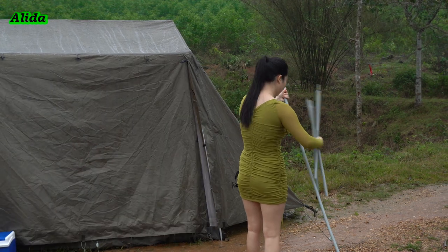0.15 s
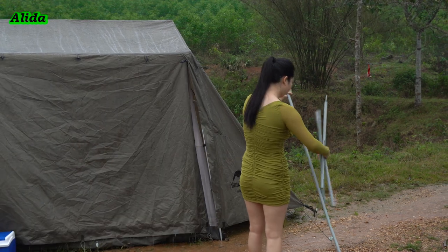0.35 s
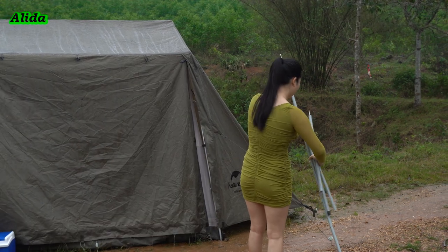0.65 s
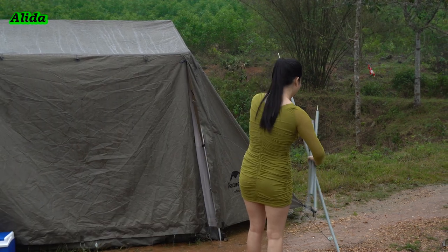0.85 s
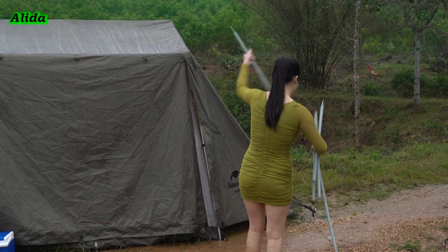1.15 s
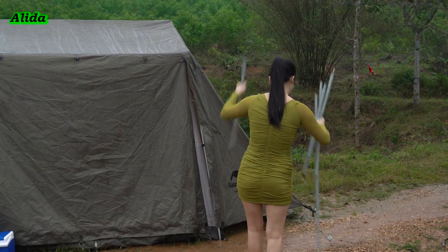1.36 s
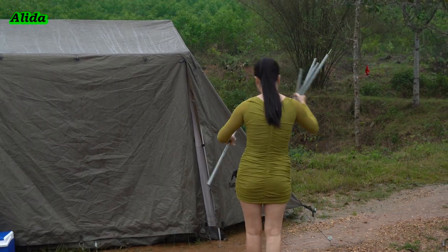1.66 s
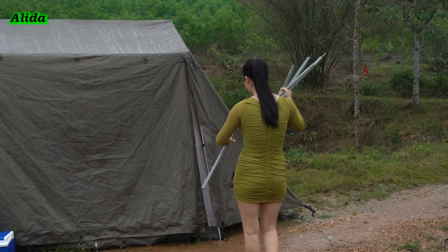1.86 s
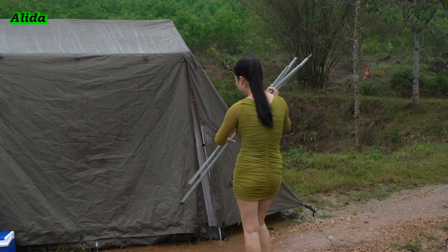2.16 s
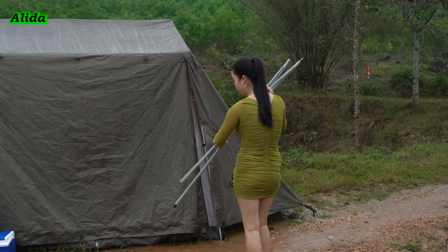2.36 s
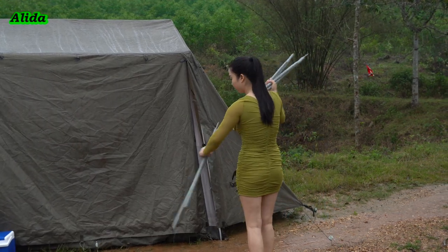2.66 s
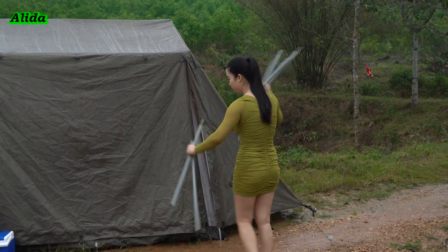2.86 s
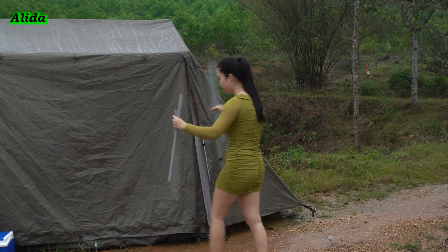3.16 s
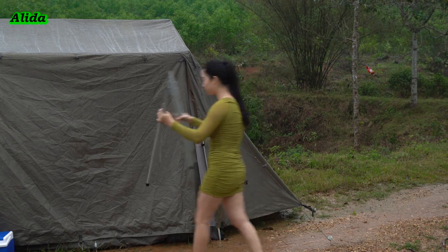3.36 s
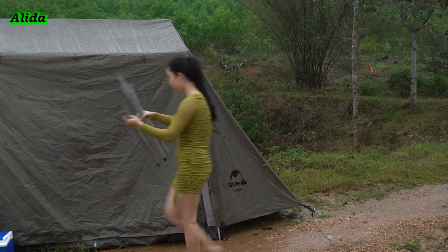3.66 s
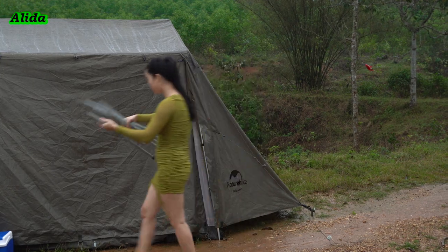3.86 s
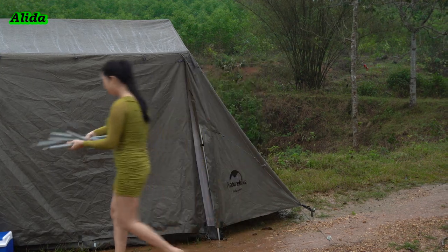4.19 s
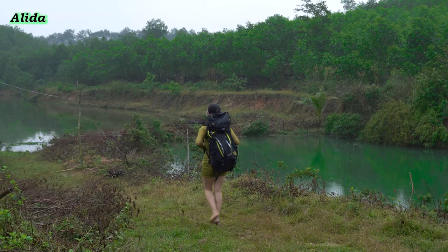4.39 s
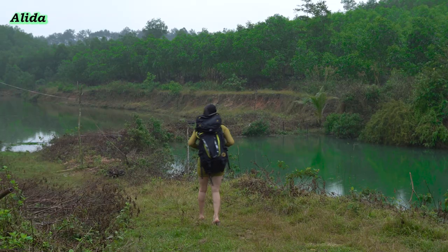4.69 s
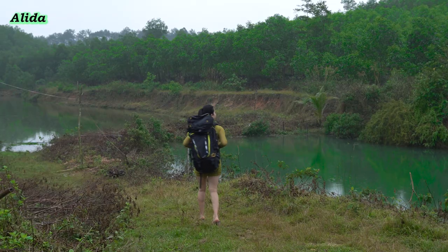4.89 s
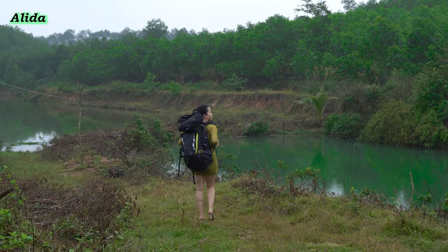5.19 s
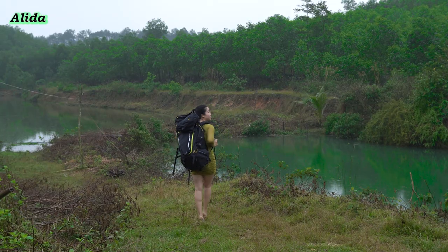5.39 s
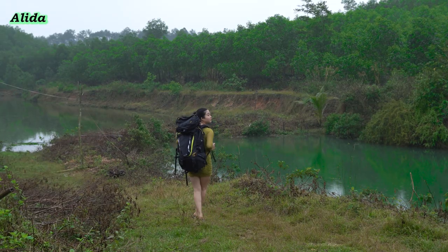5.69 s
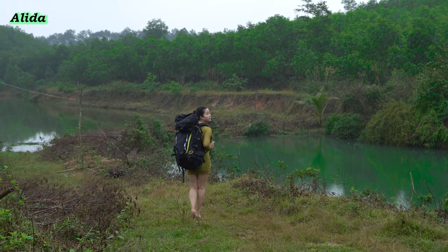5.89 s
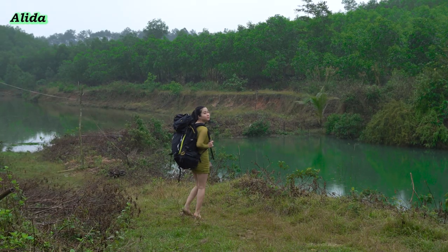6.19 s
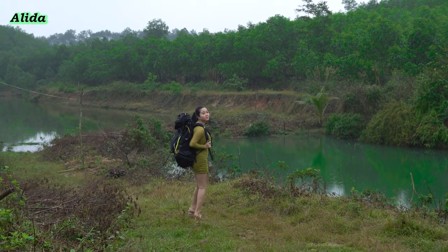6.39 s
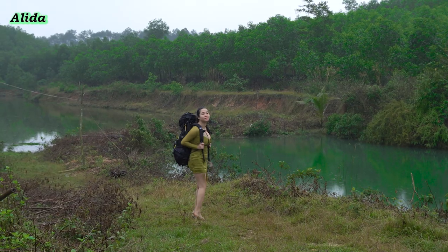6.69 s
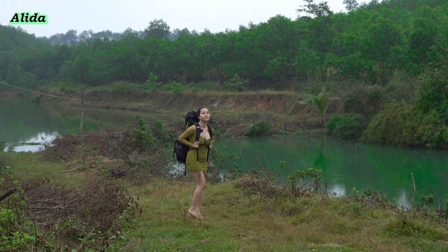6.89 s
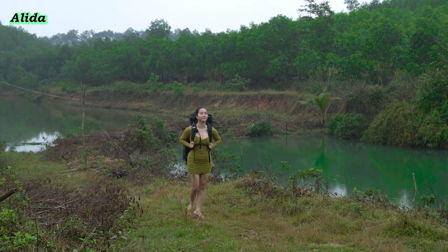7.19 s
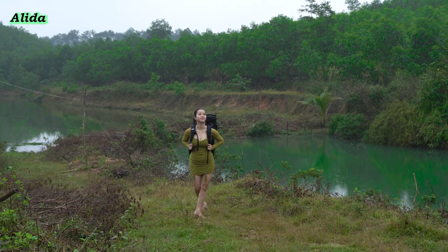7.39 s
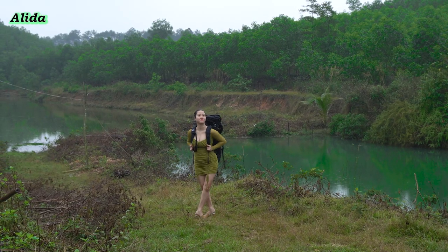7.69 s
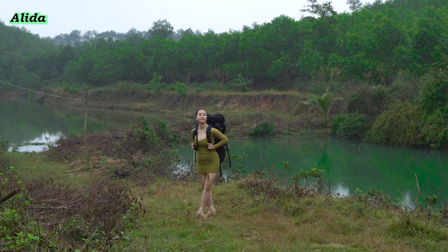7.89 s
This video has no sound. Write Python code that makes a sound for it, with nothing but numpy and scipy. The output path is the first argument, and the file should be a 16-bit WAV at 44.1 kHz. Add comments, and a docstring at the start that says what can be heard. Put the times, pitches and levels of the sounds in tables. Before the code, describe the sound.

Thin metal tent poles clank, scrape and ring briefly as they are bundled outdoors, then only soft air and faint insects remain.

```python
"""Metal tent poles are pulled apart and bundled outdoors, close to a pair of microphones.
Clanks are bursts of tiny contacts that ring the tubes' modes; beating sine pairs sing on from loose tubes.
Sections rasp as friction drives the sleeve joint, one rubs with a hollow wavering note, handling ticks.
Behind them: soft air, rustle and swishes of shaped noise, a steady insect band and a few far falling chirps."""
import sys
import numpy as np
from scipy import signal
from scipy.fft import rfft, irfft, next_fast_len
from scipy.io import wavfile
from scipy.ndimage import uniform_filter1d

SR = 44100
rng = np.random.default_rng(int(sys.argv[2]) if len(sys.argv) > 2 else 0)


def digitize_waveform(pressure):
    """Quantize a signal to 16-bit integers and store it at the path in sys.argv[1].

    Rows of a 2-D input are taken as channels; values are limited to [-1, 1].
    """
    field = np.atleast_2d(pressure).T
    bounded = np.clip(field, -1, 1)
    quanta = np.round(bounded * 32767).astype(np.int16)
    wavfile.write(sys.argv[1], SR, quanta)


N = 354996
TIME = np.arange(N) / SR


def from_db(db):
    """Decibels to gain."""
    return 10 ** (np.asarray(db) / 20)


def rms_one(x):
    """Scale to unit power."""
    return x / np.sqrt(np.mean(x ** 2) + 1e-20)


def in_time(rows):
    """Each column of a curve, sample by sample."""
    s, *columns = np.transpose(rows)
    return [np.interp(TIME, s, column) for column in columns]


def at_hz(points, hz):
    """Read a spectrum on a log-frequency axis."""
    f, value = np.transpose(points)
    return np.interp(np.log(hz), np.log(f), value)


def band(x, low_hz, high_hz, order=2):
    """Causal band-pass."""
    edges = np.clip([low_hz, high_hz], 10, .48 * SR)
    return signal.sosfilt(signal.butter(order, edges, "band", fs=SR, output="sos"), x + 1e-18)


def pan(db):
    """Left and right gains for a level difference; positive leans left."""
    return from_db(np.array([[.5], [-.5]]) * db)


def add(out, s, sound):
    """Mix a sound in at time s."""
    at = max(0, round(s * SR))
    out[:, at:at + sound.shape[1]] += sound[:, :N - at]


def drift(rate):
    """Slow chance of spread 1, with `rate` turns a second."""
    knots = rng.standard_normal(1000)
    return rms_one(np.interp(TIME * rate, np.arange(len(knots)), knots))


def stereo(mid, side, likeness):
    """Blend two independent noises so that left and right are alike to the given degree (0-1)."""
    return np.sqrt(1 + likeness) * mid + np.sqrt(1 - likeness) * side * [[1], [-1]]


def grains(size, grain_db, likeness):
    """Stereo stream of tiny contacts, their force uneven from one 16-sample grain to the next; rms 1."""
    mid, side = rng.standard_normal((2, size))
    luck = np.clip(rng.standard_normal(size // 16 + 1), -2, 2)
    force = from_db(grain_db * luck).repeat(16)[:size]
    return rms_one(force * stereo(mid, side, likeness))


def resonate(drive, resonances):
    """Parallel resonances, each with its own share of the power; rms 1."""
    out = 0
    for hz, width_hz, db in resonances:
        out = out + from_db(db) * rms_one(band(drive, hz - width_hz / 2, hz + width_hz / 2))
    return rms_one(out)


def even(x, window_s):
    """Steady the strength of a friction sound."""
    power = uniform_filter1d(np.mean(x ** 2, axis=0), max(2, int(window_s * SR)))
    return x / np.sqrt(power + 1e-9)


# every clank rebounds once: the longer its chatter, the later and weaker, and more of the bundle joins in
REBOUND_S, REBOUND_PER_CHATTER, REBOUND_LOSS_DB_PER_S, REBOUND_NEIGHBOURS_DB = .0045, 1.6, 413, 2
# pole against pole: (time [s], level before placing [dB], treble over bass [dB], rise [s], chatter [s],
# neighbour poles [dB], favoured pitch [Hz])
CLANKS = [(0.004, -54.5, -3, 0.0017, .035, -9, 5250), (0.108, -54.5, 0, .007, .019, -6, 5300),
          (0.178, -46, -3, 0.00069, 0.04, -10, 1490), (0.696, -26, -10.5, 0.00049, 0.016, -23.5, 2330),
          (0.732, -38.5, 0, 0.00079, .005, -6, 5430), (0.777, -32, -10, 0.0017, 0.01, -13.5, 2500),
          (0.848, -51, -10, .003, 0.014, 7, 2450),
                    (0.864, -40.5, -13.5, 0.0012, 0.032, -6.5, 2230),
          (0.908, -41.5, -17.5, 0.0055, 0.024, -6, 2330), (1.045, -27.5, 14.5, 0.0003, .0035, -20, 9500),
          (1.433, -45, -10, 0.0021, 0.016, -18, 2680), (2.088, -50.5, -1.5, .003, 0.0087, -9, 2470),
          (2.287, -36.5, -11.5, 0.0014, 0.014, -1.5, 2040), (2.654, -28, 14.5, .0008, .0022, -16, 11500),
          (2.767, -45.5, -8, 0.00086, 0.0082, -6, 2640), (2.824, -27.5, -5.5, 0.0076, 0.015, -4, 1490),
          (3.296, -54.5, -23.5, 0.0085, 0.011, 4, 2730), (3.336, -53, -9, .002, 0.056, -10, 2380),
          (3.385, -50, 3, 0.0024, 0.013, -12, 1900), (4.163, -27, -12, 0.002, 0.026, -16.5, 1450),
          (4.2081, -31, -10, .0004, .022, -6.5, 1800), (4.229, -28.5, -4.5, 0.0039, 0.0078, -7, 5800),
          (4.244, -36.5, -14, 0.002, .014, -13, 2450), (4.276, -42.5, -11, 0.0035, .011, -10, 5430)]


def clanks():
    """Each blow of pole on pole is followed by one rebound."""
    out = np.zeros((2, N))
    for s, db, tilt_db, rise_s, chatter_s, neighbours_db, favoured_hz in CLANKS:
        add(out, s, clank(db, tilt_db, rise_s, chatter_s, neighbours_db, favoured_hz))
        gap_s = REBOUND_S + REBOUND_PER_CHATTER * chatter_s
        rebound_db = db - REBOUND_LOSS_DB_PER_S * gap_s
        add(out, s + gap_s, clank(rebound_db, tilt_db, chatter_s / 2, chatter_s,
                                  neighbours_db + REBOUND_NEIGHBOURS_DB, favoured_hz))
    return out


# the middle band: its level when the neighbours ring as loud as the pole [dB], and its dB per dB of theirs
MIDDLE_DB, MIDDLE_FOLLOWS = 4, 0.43
# bending modes of the pole in the hand: (frequency [Hz], relative level [dB], t60 [s])
POLE = [(772, -19, 0.11), (1485, -4.5, 0.094), (2432, -6, 0.037), (2465, -4.5, 0.087), (3523, -7.5, 0.068),
        (4730, -9.5, 0.07), (5570, -11, 0.03), (6150, -13, 0.019), (7570, 3, 0.018), (8280, 1, 0.04),
        (9140, -1.5, 0.018), (10850, -1.5, 0.074), (11600, -17, 0.044), (12400, -10.5, 0.035),
        (14800, 4.5, 0.02)]
# bending modes of its neighbours in the bundle: (frequency [Hz], relative level [dB], t60 [s])
NEIGHBOURS = [(654, -14.5, 0.11), (1580, -7.5, 0.1), (1803, -4.5, 0.047), (1940, -13, 0.031),
              (2726, 4.5, 0.07), (2846, -38, 0.062), (3910, 0.5, 0.035), (5230, 0, 0.13),
              (6600, -36, 0.023), (7200, -49.5, .07), (8450, -7, 0.046), (9500, 3.5, 0.02), (9840, 7, 0.04),
              (14100, 3, .02)]


def clank(db, tilt_db, rise_s, chatter_s, neighbours_db, favoured_hz, impact_db=0.5, impact_s=0.002,
          crack_db=-12.0, shimmer_db=-6.0, shimmer_t60=0.11, settle_s=0.0062, strike_s=0.018):
    """Tubes buzz against each other in a burst of tiny contacts, then ring briefly in the hand."""
    t = TIME[:SR // 4]
    pressure = np.minimum((t + 1 / SR) / max(rise_s, 1 / SR), 1) * np.exp(-.5 * t / chatter_s)
    pressure = pressure * (1 + from_db(impact_db) * np.exp(-t / impact_s))   # extra force at first
    settling = np.exp(-np.maximum(t - chatter_s, 0) / settle_s)
    contacts = grains(len(t), grain_db=5.0, likeness=0.5) * pressure * settling

    neighbours = ring(contacts[0], NEIGHBOURS, favoured_hz)
    metal = ring(contacts[0], POLE, favoured_hz) + from_db(neighbours_db) * neighbours

    # the contacts also radiate directly, as a broad crack with a gap between bending and wall modes
    crack = band(contacts, 1260, 2750, order=4)
    crack = crack + 1.23 * band(contacts, 4880, 7920, order=4)
    crack = crack + 0.72 * band(contacts, 7000, 14200, order=4)

    # countless weak wall modes blur it into a shimmer, fuller the longer the chatter lasts
    walls = grains(len(t), grain_db=7.0, likeness=0.97) * from_db(-60 * t / shimmer_t60)
    shimmer = rms_one(signal.fftconvolve(crack[:1], walls, axes=1)[:, :len(t)])
    shimmer = shimmer * min(1, chatter_s / strike_s) ** 0.46
    sound = rms_one(metal) + from_db(crack_db) * rms_one(crack) + from_db(shimmer_db) * shimmer

    # the hardness of the touch shares the energy between low, middle and high modes
    middle_db = MIDDLE_DB + MIDDLE_FOLLOWS * neighbours_db
    out = 0
    for low_hz, high_hz, share_db, lean_db in [(700, 3430, -tilt_db / 2, 0),
                                               (3300, 6780, middle_db, TREBLE_LEFT_DB),
                                               (7000, 15000, tilt_db / 2, TREBLE_LEFT_DB)]:
        part = band(sound, low_hz, high_hz, order=4)
        part = part / np.std(part[:, :int(strike_s * SR)])
        out = out + from_db(db + share_db) * pan(lean_db) * part
    return out


def ring(contacts, modes, favoured_hz, favour_db=9.5, detune=0.00556, scatter_db=1.5, spread=0.47):
    """Contacts excite every mode; the place of the touch favours some, the grip shifts pitch and strength."""
    out = 0
    for hz, db, t60 in modes:
        luck, turn, shift = rng.standard_normal(3)
        height = np.sqrt(hz / 5000)   # high modes are the most sensitive
        shifted_hz = hz * (1 + detune * height * shift)
        pole = from_db(-60 / (t60 * SR)) * np.exp(2j * np.pi * shifted_hz / SR)
        swing = signal.lfilter([1], [1, -pole], contacts + 1e-18)
        phase = spread * turn * height * np.array([[1], [-1]])   # each side hears the mode in its own phase
        mode = rms_one(np.real(swing * np.exp(1j * phase)))
        favour = favour_db * np.exp(-(np.log2(hz / favoured_hz) / 0.18) ** 2)
        out = out + from_db(db + favour + scatter_db * luck) * mode
    return out


# a tube left loose sings on in one mode: (time [s], frequency [Hz], level before placing [dB], t60 [s])
SINGING = [(0.18, 5180, -47, 0.37), (0.434, 1530, -53, .34), (0.737, 5260, -39, .35),
           (1.056, 5280, -33.5, 0.15), (1.055, 8600, -37, 0.29), (2.297, 5340, -38.5, 0.45),
           (2.655, 1455, -30, 0.3), (2.657, 3447, -24.5, 0.12), (2.657, 4580, -28.5, 0.13),
           (2.70, 5100, -41.5, 0.64), (2.832, 5050, -38.5, 0.64), (2.834, 5320, -30.5, 0.29),
           (2.834, 2716, -43.5, 0.56), (4.167, 3443, -17, 0.077), (4.238, 3450, -24.5, 0.16),
           (4.265, 5100, -33, .25)]


def singing(rise_s=0.0032, beat_hz=17, twin=0.69):
    """A slightly oval tube has twin modes that beat as they fade."""
    out, t = np.zeros((2, N)), TIME[:SR]
    for s, hz, db, t60 in SINGING:
        first = np.sin(2 * np.pi * hz * t)
        second = np.sin(2 * np.pi * ((hz + beat_hz) * t + rng.random((2, 1))))
        fade = from_db(db - 60 * t / t60) * (1 - np.exp(-t / rise_s))
        add(out, s, fade * (first + twin * second))
    return out


# full speed is kept for a share of the run-up; then the rasp dies, leaving a faint ring in the joint
SLIDE_HOLD, SLIDE_T60_S, JOINT_RING_DB, JOINT_T60_S = 0.2, 0.034, -28, 0.25
# a section slides, louder as it gathers speed: (start [s], run-up [s], full-speed level before placing [dB],
# swell [dB])
SLIDES = [(0.981, 0.05, -20, 17.5), (2.547, 0.013, -37.5, 12), (2.57, 0.067, -19, 23)]
# resonances of the sleeve joint: (frequency [Hz], width [Hz], relative level [dB])
SLEEVE = [(1800, 250, -19), (2476, 130, -4), (3560, 860, -24), (5010, 440, -11.5), (5820, 870, -9.5),
          (7620, 280, 5), (7850, 460, -8.5), (8970, 470, -1.5), (9320, 65, -4), (10400, 340, -10.5),
          (11600, 1100, -41), (15000, 750, -13)]


def slides():
    """Stick and slip of metal in metal drives the resonances of the joint."""
    level = 0
    for s, length_s, db, swell_db in SLIDES:
        speed = np.clip((TIME - s) / length_s, 0, 1)
        stopped_s = np.maximum(TIME - s - length_s * (1 + SLIDE_HOLD), 0)
        rasp_fade = from_db(-60 * stopped_s / SLIDE_T60_S)
        joint_fade = from_db(JOINT_RING_DB - 60 * stopped_s / JOINT_T60_S)
        level = level + np.sqrt(speed) * from_db(db - swell_db * (1 - speed)) * (rasp_fade + joint_fade)
    friction = grains(N, grain_db=0.5, likeness=0.96)
    rasp = resonate(friction, SLEEVE) + from_db(-13.5) * rms_one(band(friction, 2600, 12000))
    return level * even(rasp, window_s=0.0047) * pan(TREBLE_LEFT_DB)


LEFT_LEADS_S, TREBLE_LEFT_DB = .00001, 2.5   # the left side hears the poles sooner and brighter
# the poles are carried from right to left: (time [s], left over right [dB])
PLACE = [(0.7, -2), (2.65, -0.9), (4.2, 2)]


def placed(x):
    """The poles move across the scene; their sound reaches the left side a little sooner."""
    size = next_fast_len(N)
    delay = np.exp(-2j * np.pi * np.fft.rfftfreq(size, 1 / SR) * LEFT_LEADS_S)
    late = irfft(rfft(x[1], size) * delay, size)[:N]
    return np.array([x[0], late]) * pan(in_time(PLACE)[0])


def outdoors(x, wet_db=-19, t60=0.5):
    """Tent wall, ground and bushes scatter a faint short tail."""
    t = TIME[:SR // 2]
    scatter = band(rng.standard_normal((2, len(t))), 500, 16500, order=1)
    scatter = scatter * from_db(-60 * t / t60) * (t > .006)
    scatter /= np.sqrt(np.sum(scatter ** 2, axis=1, keepdims=True))
    return x + from_db(wet_db) * signal.fftconvolve(x, scatter, axes=1)[:, :N]


RUB_RELEASE_DB_PER_S = 67
# bright edge, relative to the scuffing: strong as the surfaces first bite, then settling
EDGE_DB, BITE_DB, BITE_S = -17, 15.5, 0.13
# the hollow rub: (time [s], air column level before panning [dB], scuffing level before a 2 dB trim [dB])
RUB = [(3.66, -76, -92), (3.702, -50.5, -46.5), (3.784, -39, -41), (3.87, -47.5, -50), (3.916, -39.5, -49),
       (3.938, -40.5, -42.5), (3.996, -37.5, -49), (4.05, -54.5, -48), (4.102, -49.5, -53),
       (4.11, -46, -46), (4.135, -52.5, -49.5)]
# lowest note of the air column as the opening changes: (time [s], frequency [Hz])
RUB_NOTE = [(3.72, 477.6), (3.79, 496), (3.825, 445.6), (3.87, 489), (3.91, 440.5), (3.97, 462),
            (4.15, 477)]
# air column before its note wavers, lowest note first: (frequency [Hz], width [Hz], relative level [dB])
COLUMN = [(459.7, 24, -1.5), (526, 18, -8), (466, 80, -8), (891, 33, -8.5), (1350, 54, -22)]
# tube wall under the rub: (frequency [Hz], width [Hz], relative level [dB])
SCUFF = [(725, 57, -4.5), (927, 110, 2.5), (1060, 89, 3.5), (1195, 154, 2), (1390, 55, -1), (1545, 17, -9)]
# bright edge of the rub: (frequency [Hz], width [Hz], relative level [dB])
EDGE = [(1780, 430, 0.11), (2820, 300, -2.3)]


def hollow_rub():
    """Rubbing along an open tube sounds its air column, whose note wavers."""
    column_db, scuff_db = in_time(RUB)
    start_s, end_s = RUB[0][0], RUB[-1][0]
    edge_db = scuff_db + EDGE_DB + BITE_DB * np.exp(-((TIME - start_s) / BITE_S) ** 2)
    note_hz, = in_time(RUB_NOTE)
    friction = grains(N, grain_db=0.5, likeness=0.92)

    # reading the resonances faster or slower bends their pitch
    clock = np.cumsum(note_hz / COLUMN[0][0])
    column = np.array([np.interp(clock, np.arange(N), side) for side in resonate(friction, COLUMN)])
    column = even(band(column, 250, 2500, order=4), window_s=0.047)
    column = from_db(column_db) * column * pan(3.1)

    scuff = from_db(scuff_db - 2.0) * even(resonate(friction, SCUFF), window_s=0.048) * pan(10.9)
    edge = from_db(edge_db) * resonate(friction, EDGE) * pan(8.7)
    release = from_db(-RUB_RELEASE_DB_PER_S * np.maximum(TIME - end_s, 0))
    return (column + scuff + edge) * (TIME > start_s) * release


TICK_T60_S = 0.029   # of a tick one octave wide; wider ones die sooner
# fainter ticks come at random until the handling ends
HANDLING_S, FAINT_TICKS_PER_S, FAINT_TICK_DB, FAINT_TICK_HZ, FAINT_TICK_OCTAVES = 3.9, 5.9, -43, 4800, 1.7
# the clearest dry ticks and taps of handling: (time [s], peak level [dB], centre [Hz], width [octaves])
TICKS = [(0.191, -33, 4970, 1.8), (0.309, -37, 496, 1.43), (2.028, -25, 4570, 2.6),
         (2.392, -39.5, 1890, 0.41), (2.460, -36, 2210, 0.75), (2.474, -36, 1780, 0.48),
         (2.522, -38.5, 1770, 0.52), (2.986, -33, 3970, 2), (3.550, -37, 4900, 1.6),
         (4.630, -38, 2900, 2.1), (4.710, -43, 5470, 1.1)]


def ticks():
    """Damped contacts: band-passed bursts of grains that die within milliseconds."""
    out, t = np.zeros((2, N)), TIME[:SR // 10]
    faint_times = HANDLING_S * rng.random(round(FAINT_TICKS_PER_S * HANDLING_S))
    faint = [(s, FAINT_TICK_DB, FAINT_TICK_HZ, FAINT_TICK_OCTAVES) for s in faint_times]
    for s, db, hz, octaves in list(TICKS) + faint:
        burst = grains(len(t), grain_db=-3.0, likeness=0.87) * from_db(-60 * t * octaves / TICK_T60_S)
        tick = band(burst, hz / 2 ** (octaves / 2), hz * 2 ** (octaves / 2))
        add(out, s, from_db(db) * tick / np.abs(tick).max())
    return out


# rustle of cloth and grass while the poles are handled: (time [s], level before the low cut [dB])
RUSTLE = [(0, -53), (1.5, -59.5), (2.5, -54), (3.15, -58.5), (3.42, -52), (3.7, -58), (4.3, -56),
          (4.4, -63), (8.05, -64.5)]
# its colour: (frequency [Hz], relative level [dB per Hz])
RUSTLE_COLOUR = [(60, -49), (220, 10.5), (600, 9.5), (1800, 12.5), (4000, 9.5), (8000, 9.5), (16000, -18)]


def rustle():
    """Cloth and grass brush as patchy noise that flutters in level."""
    level = from_db(in_time(RUSTLE)[0] + 2.5 * drift(60))
    return level * coloured_noise(RUSTLE_COLOUR, patchy_db=2.0)


# soft far swishes in the grass: (time [s], length [s], level [dB] before a smooth swell and fade)
SWISHES = [(4.761, 0.36, -64.5), (5.17, 0.15, -63), (6.496, 0.22, -64.5)]


def swishes():
    """Narrow bands of uneven grains swell and fade."""
    out = np.zeros((2, N))
    for s, length_s, db in SWISHES:
        size = int(length_s * SR)
        swish = rms_one(band(grains(size, grain_db=6.0, likeness=0.64), 1610, 1950))
        add(out, s, from_db(db) * np.hanning(size) * swish)
    return out


# far bird: (time [s], peak level [dB])
CHIRPS = [(6.44, -61), (6.49, -59), (6.855, -62), (6.905, -56.5)]


def chirps():
    """A far bird's short notes fall steadily in pitch."""
    out = np.zeros((2, N))
    size = int(0.027 * SR)
    pitch_hz = np.linspace(4650, 3950, size)
    chirp = np.hanning(size) * np.sin(2 * np.pi * np.cumsum(pitch_hz) / SR)
    for s, db in CHIRPS:
        add(out, s, from_db(db) * chirp[None])
    return out


# insect band: (frequency [Hz], width [Hz], relative level [dB])
INSECTS = [(6860, 560, 0)]


def insects():
    """Many insects merge into one steady band of grains, drifting slightly in level."""
    return from_db(-64.5 + 1.2 * drift(23)) * resonate(grains(N, grain_db=0.5, likeness=0.037), INSECTS)


def hiss():
    """A faint steady band of high noise."""
    return from_db(-70.5) * rms_one(band(grains(N, grain_db=0.0, likeness=0.5), 10900, 15200))


AIR_DB = -58.5   # before the low cut
# outdoor air: (frequency [Hz], relative level [dB per Hz])
AIR = [(30, -27), (51, -10), (90, -14), (131, -7), (259, -8), (600, -1), (1160, -8), (1720, -7),
       (4190, -12), (5740, -16), (7870, -17.5), (14000, -20), (16000, -24)]


def air():
    """Soft open air as broad, slightly flickering noise."""
    return from_db(AIR_DB) * coloured_noise(AIR, patchy_db=1.92)


# how alike air and rustle are on left and right: (frequency [Hz], likeness [0-1])
AIR_LIKENESS = [(60, 0.99), (180, 0.99), (550, 0.35), (1650, 0.11), (4970, 0.078), (15000, 0.2)]


def coloured_noise(spectrum, patchy_db):
    """Half-octave bands of stereo noise, each flickering a little; rms 1."""
    out, edges = 0, 31 * 2 ** (np.arange(19) / 2)
    white = rng.standard_normal((2, 2, N))
    for k, (low, high) in enumerate(zip(edges, edges[1:])):
        mid, side = band(white[k % 2], low, high)   # adjacent bands use different noise
        hz = np.sqrt(low * high)
        gain = from_db(at_hz(spectrum, hz) + patchy_db * drift(35))
        out = out + gain * stereo(mid, side, at_hz(AIR_LIKENESS, hz))
    return rms_one(out)


def background():
    """Air and rustle with their lows cut, then insects, hiss, swishes and chirps."""
    return band(air() + rustle(), 134, 25700, order=1) + insects() + hiss() + swishes() + chirps()


def scene():
    """The poles near the microphones, the landscape behind."""
    stop_db, = in_time([(4.326, -2.5), (4.334, -41)])   # level of the poles: the last ringing stops short
    poles = outdoors(placed(clanks() + singing() + slides())) * from_db(stop_db)
    return poles + hollow_rub() + ticks() + background()


def record(dry):
    """The top is cut steeply above 16.1 kHz."""
    return signal.sosfilt(signal.ellip(12, .1, 80, 16100, fs=SR, output="sos"), dry)


dry = scene()
out = record(dry)
digitize_waveform(out)
```